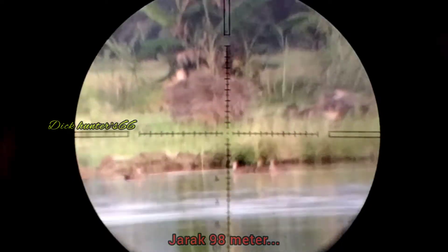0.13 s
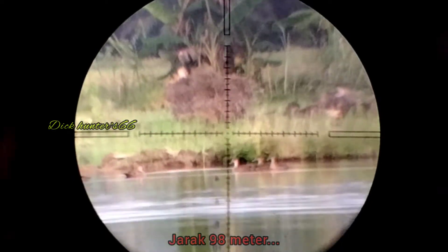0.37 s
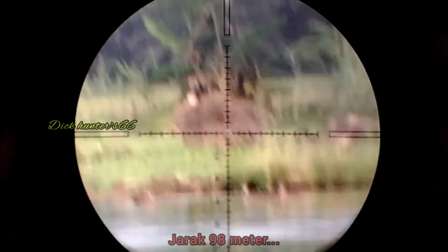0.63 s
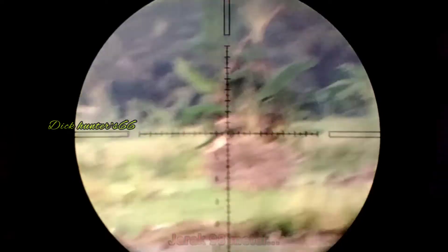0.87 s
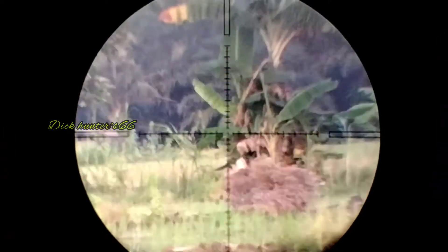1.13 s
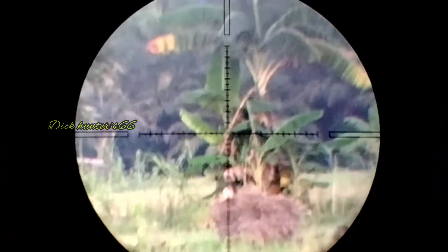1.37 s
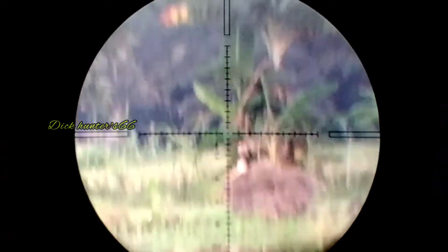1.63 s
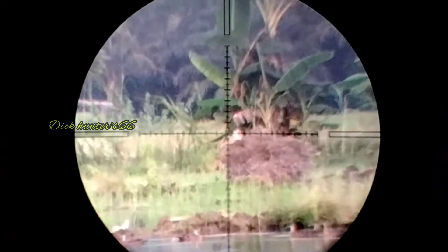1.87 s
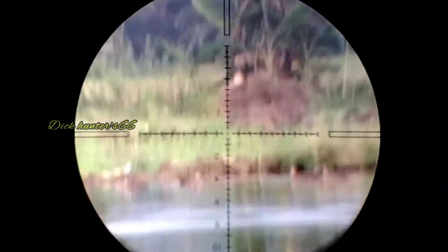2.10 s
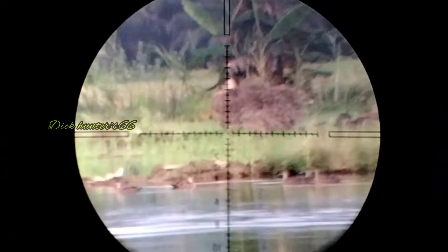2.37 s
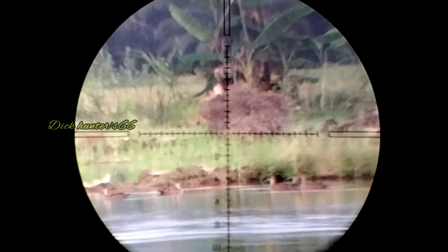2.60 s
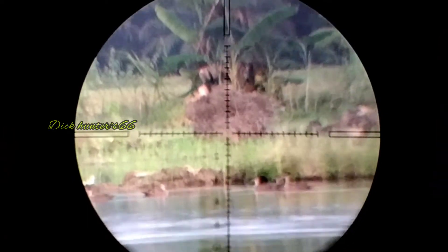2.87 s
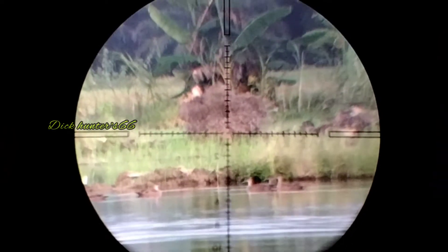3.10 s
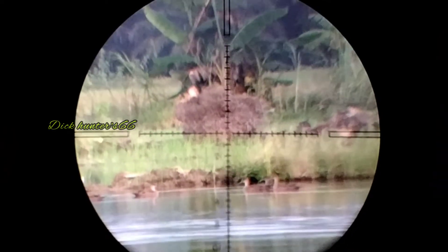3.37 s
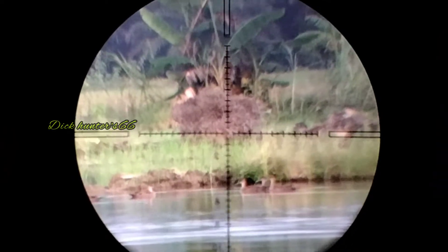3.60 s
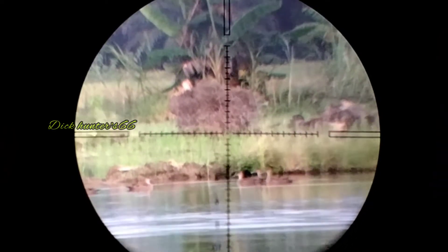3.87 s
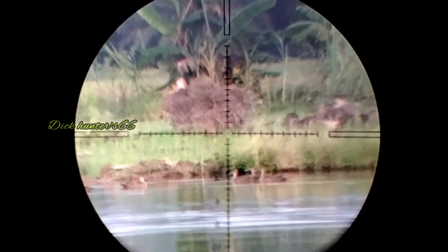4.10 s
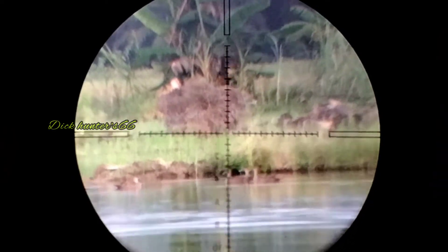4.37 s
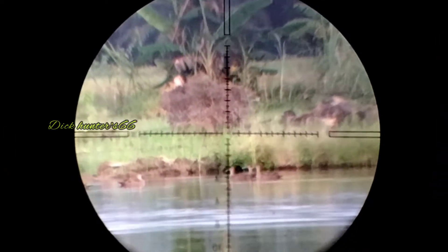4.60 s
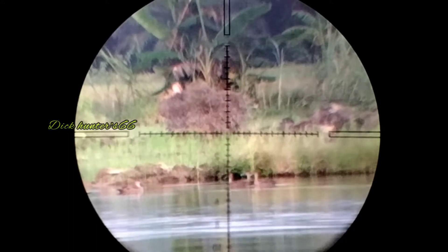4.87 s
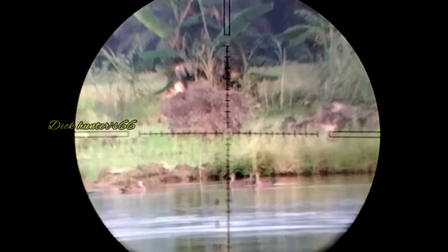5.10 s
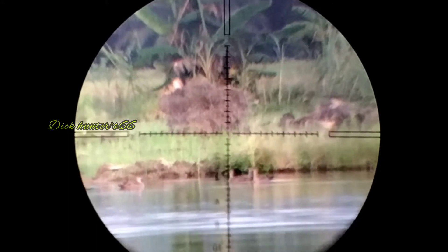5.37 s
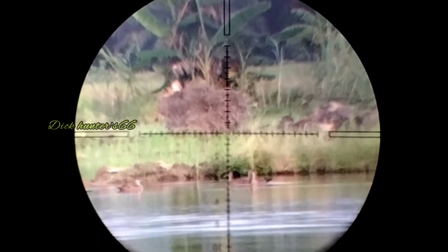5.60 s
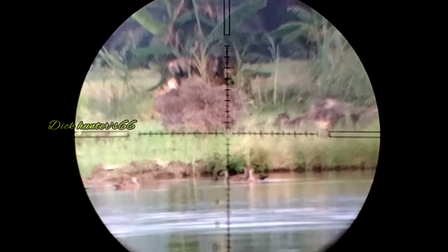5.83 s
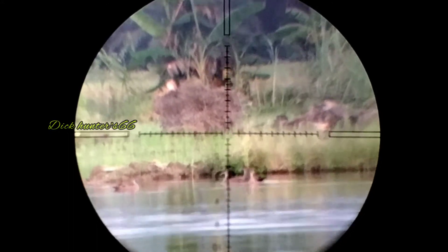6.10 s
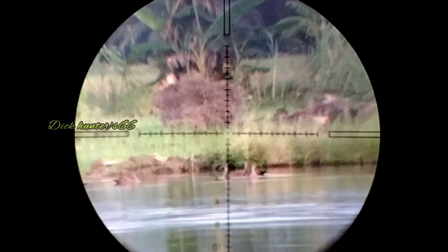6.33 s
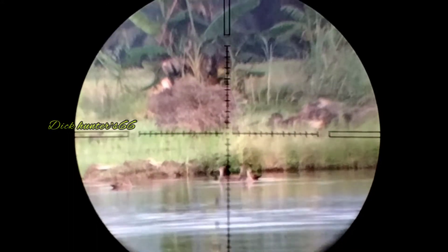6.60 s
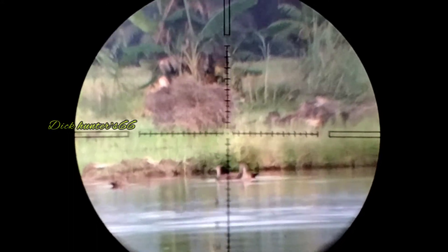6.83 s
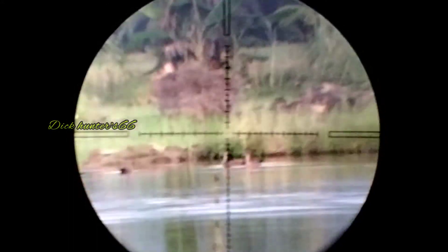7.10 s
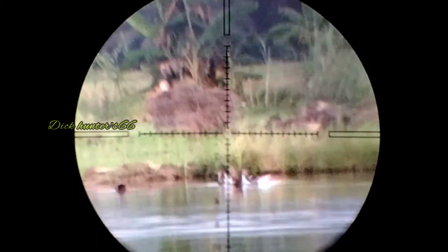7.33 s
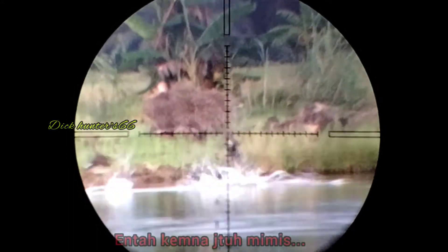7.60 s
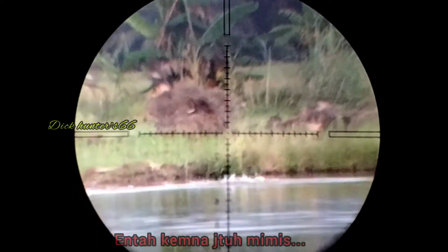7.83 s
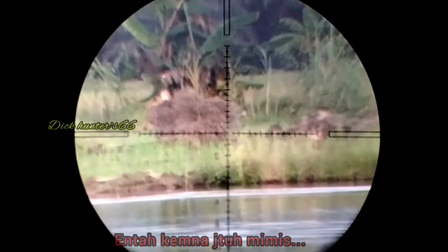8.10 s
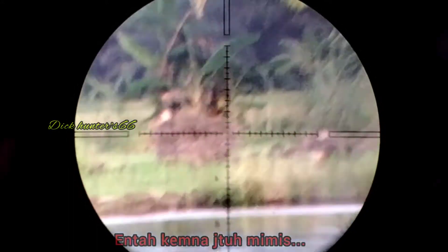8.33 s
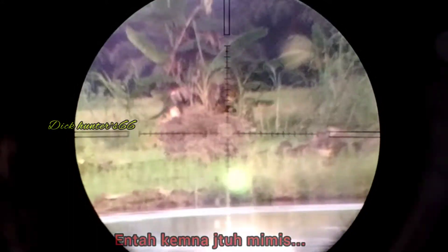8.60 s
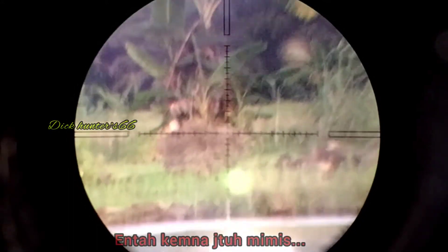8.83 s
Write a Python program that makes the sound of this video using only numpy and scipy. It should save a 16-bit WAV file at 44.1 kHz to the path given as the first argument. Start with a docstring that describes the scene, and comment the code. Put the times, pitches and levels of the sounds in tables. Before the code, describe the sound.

Outdoors by a pond, heard from a microphone attached to an air rifle, identical in both channels. From 0 s a thin, shrill insect whine near 9 kHz pulses in quick chirps, stops around 2.4 s, and resumes at about 2.7 s. Low wind buffets come and go, strongest from 1 to 4.4 s, with dull pops near 1.6, 2.1 and 2.3 s. Faint bubbles blip, clustering around 3.3 s, amid tiny dry rustling ticks. Small clicks occur near 0.4 and 5.3 s. At 6.8 s a trigger tick leads straight into a very loud, sharp crack, a rattling action and a burst of air, hissing until 7.0 s. A hollow metallic ping rings on for about a second over faint low rumble. The nearer insect song ends around 7.4 s, leaving a softer whine. Light clicks follow from 7.5 s, then a crisp, louder double clack at 8.1 s before quiet ambience.

```python
"""Beside a pond an air rifle is fired once, the microphone fixed to the gun: trigger tick, crack, rattling action,
escaping air and the ping of the air tube, then a few handling clicks. Insects whine near 9 kHz, water bubbles
blip faintly, a light wind buffets the microphone. Wind and air are shaped noise, contacts are noise bursts,
tube and knocks are decaying sines, nearer insects are a pulsed tone, bubbles are short rising blips."""
import sys
import numpy as np
from scipy import signal
from scipy.fft import rfft, irfft, next_fast_len
from scipy.io import wavfile
from scipy.ndimage import uniform_filter1d, map_coordinates

SR = 44100
rng = np.random.default_rng(int(sys.argv[2]) if len(sys.argv) > 2 else 0)


def dump(signal):
    """Clip the signal to [-1, 1] and save it as 16-bit WAV at the path in sys.argv[1]."""
    limited = np.clip(np.atleast_2d(signal).T, -1, 1)
    pcm = np.round(limited * 32767).astype(np.int16)
    wavfile.write(sys.argv[1], SR, pcm)


def rack_gain(trim_db):
    """Turn a fader trim in dB into the linear factor to multiply a signal by."""
    fader = np.asarray(trim_db, float)
    return 10 ** (fader / 20)


N = 395136
SHOT_S = 6.8265


def unit(x):
    """Scaled to rms 1."""
    return x / np.sqrt(np.mean(x ** 2) + 1e-20)


def wobble(knots_per_s):
    """Smooth random curve through normally distributed knots."""
    knots = rng.standard_normal(int(N * knots_per_s / SR) + 4)
    coarse = np.arange(0, N + 16, 16)
    curve = map_coordinates(knots, [coarse * knots_per_s / SR])
    return np.interp(np.arange(N), coarse, curve)


def coloured(x, spectrum):
    """x filtered through (f/Hz, level/dB) points joined on a log f axis."""
    size = next_fast_len(len(x) + 8192)
    hz, db = np.transpose(spectrum)
    log_f = np.log(np.fft.rfftfreq(size, 1 / SR) + 1)
    gain = rack_gain(np.interp(log_f, np.log(hz + 1), db, -120, -120))
    return irfft(rfft(x, size) * gain, size)[:len(x)]


def noise(spectrum):
    """Coloured noise of rms 1."""
    return unit(coloured(rng.standard_normal(N), spectrum))


def patchy(x, depth_db, shape):
    """x with random patches of gain, shape = (bins, frames) wide, rms 1."""
    z = signal.stft(x, nperseg=512)[2]
    knots = rng.standard_normal(np.array(z.shape) // shape + 2)
    field = map_coordinates(knots, np.indices(z.shape) / np.reshape(shape, (2, 1, 1)), order=1)
    patched = z * rack_gain(depth_db * unit(field))
    return unit(signal.istft(patched, nperseg=512)[1][:N])


def burst(t60_s):
    """Short decaying noise burst of peak 1."""
    t = np.arange(2000) / SR
    puff = rng.standard_normal(len(t)) * rack_gain(-60 * t / t60_s) * (1 - np.exp(-t / 0.00021))
    return puff / np.abs(puff).max()


def add(track, s, sound):
    """Mixes a sound in at time s."""
    part = track[round(s * SR):][:len(sound)]
    part += sound[:len(part)]


# buffet spectrum, relative: [f/Hz, level/dB]
BUFFET_SPECTRUM = [(12, -17.5), (20, -0.5), (40, 1), (80, -6.5), (130, -17.5), (200, -35), (260, -73.5)]
# drone spectrum, relative: [f/Hz, level/dB]
DRONE_SPECTRUM = [(50, -21.5), (80, -5.5), (125, -0.5), (180, -7), (300, -20.5), (400, -42)]
# gusts reaching the microphone, before flutter: [start t/s, hold/s, buffet level/dB]
GUSTS = [(0.021, .04, -60.5), (.58, 0.069, -56.5), (.74, 0.0396, -61.5), (1.095, 0.106, -48),
         (1.377, .33, -48.5), (1.847, 0.0183, -49), (2.004, 0.5616, -45.5), (2.676, 0.092, -46),
         (2.841, 0.034, -42.5), (2.917, 0.0224, -44), (3.065, 0.0335, -45), (3.26, 0.023, -49),
         (3.36, 0.216, -47), (3.729, 0.661, -47.5), (4.558, .03, -59.5), (5.072, 0.107, -62),
         (5.628, 0.076, -52.5), (5.868, .07, -52.5), (6.176, .04, -61.5), (6.342, 0.0324, -54.5),
         (6.406, 0.028, -55.5), (6.585, 0.245, -56.5)]
# wind pops on the microphone: [t/s, level/dB of the narrow bump, width/s]
POPS = [(1.24, -45.5, 0.0036), (1.585, -29.5, 0.00283), (2.065, -26.5, 0.001524), (2.346, -31, 0.00237),
        (6.34, -42.5, 0.00454)]
GUST_RISE_DB_PER_S, GUST_FALL_DB_PER_S, CALM_DB = 402.5, 275.5, -70
DRONE_DB, DRONE_DB_PER_BUFFET_DB, DRONE_AVERAGE_S = -63, 0.123, 0.41
SHAKE_DB, SHAKE_T60_S = -55.5, 4.68  # low rumble while the gun settles after the shot


def wind():
    """Gusts buffet the microphone in lumps and single pops; a steadier drone follows their mean."""
    t = np.arange(N) / SR
    buffet_db = np.full(N, float(CALM_DB))
    for s, hold_s, db in GUSTS:
        rise_db = GUST_RISE_DB_PER_S * np.maximum(s - t, 0)
        fall_db = GUST_FALL_DB_PER_S * np.maximum(t - s - hold_s, 0)
        buffet_db = np.maximum(buffet_db, db - rise_db - fall_db)
    shake = (t > SHOT_S) * rack_gain(SHAKE_DB - 60 * (t - SHOT_S) / SHAKE_T60_S)
    lumps = unit(rack_gain(2.64 * wobble(20)) * noise(BUFFET_SPECTRUM))
    out = (rack_gain(buffet_db + 1.23 * wobble(8.9)) + shake) * lumps

    slow_db = uniform_filter1d(buffet_db, size=round(DRONE_AVERAGE_S * SR))
    drone_db = DRONE_DB + DRONE_DB_PER_BUFFET_DB * (slow_db - slow_db.mean())
    out += rack_gain(drone_db + 1.453 * wobble(1.483) + 1.78 * wobble(5)) * noise(DRONE_SPECTRUM)

    t = np.arange(-882, 882) / SR
    for s, db, width_s in POPS:
        bump = np.exp(-(t / width_s) ** 2) - 0.263 * np.exp(-(t / (4 * width_s)) ** 2)
        add(out, s + t[0], rack_gain(db) * bump)
    return out


# chorus spectrum, relative: [f/Hz, level/dB]
CHORUS_SPECTRUM = [(150, -51.5), (250, -20), (320, -16), (560, -19.5), (900, -22.5), (1500, -19.5),
                   (2100, -23.5), (2900, -18.5), (4200, -29), (5000, -25), (6100, -36), (7000, -25),
                   (8200, -20.5), (8600, -15), (8780, -5), (9300, -2.5), (9750, -7), (10050, -14),
                   (10400, -23), (11000, -25.5), (13500, -29.5), (14500, -20.5), (16000, -22.5)]
# songs of the nearer insects: [start t/s, end t/s, level/dB re CHORUS_DB, chirp depth/0-1]
SONGS = [(-.05, 2.38, 9, 1), (2.739, 7.4, 9.5, 0.83), (7.0, 8.96, -15.5, .6)]
CHORUS_DB, CHORUS_STEP_AFTER_SHOT_DB = -58, 0.5
WING_HZ, WING_WAVER_HZ, PULSES_PER_S = 9100, 35, 138
CHIRPS_PER_S, TIRED_CHIRPS_PER_S, TIRING_S = 9.09, 6.9, .88  # tempo, tempo at song end, slowing time
WARM_UP_DB, WARM_UP_S = -7.5, 0.58  # level offset at song start, its time constant


def insects():
    """A few singers above a blurred chorus: pulse-train chirps swell and break off, slowing at song end."""
    t, songs = np.arange(N) / SR, np.zeros(N)
    for start, end, db, depth in SONGS:
        tiring = np.clip(t - end + TIRING_S, 0, None)
        lost_chirps = (CHIRPS_PER_S - TIRED_CHIRPS_PER_S) * tiring ** 2 / (2 * TIRING_S)
        chirps = CHIRPS_PER_S * (t - start) - lost_chirps
        swell = 1 - min(depth, 1) * (1 - (chirps % 1) ** .9)
        level = rack_gain(db + WARM_UP_DB * np.exp(-np.abs(t - start) / WARM_UP_S))
        songs += ((t > start) & (t < end)) * level * swell
    beat = np.cumsum(PULSES_PER_S + 3 * wobble(4)) / SR
    pulses = (.5 + .5 * np.cos(2 * np.pi * beat)) ** 1.5
    wing_cycles = np.cumsum(WING_HZ + WING_WAVER_HZ * wobble(70)) / SR
    wing = rack_gain(1.7 * wobble(30)) * np.sin(2 * np.pi * wing_cycles)
    singers = uniform_filter1d(songs, size=400) * pulses * wing

    chorus = patchy(noise(CHORUS_SPECTRUM), depth_db=1.8, shape=(3, 3))
    drift_db = CHORUS_STEP_AFTER_SHOT_DB * (t > SHOT_S) + 0.147 * wobble(1.425) + 0.744 * wobble(8.1)
    return rack_gain(CHORUS_DB) * (rack_gain(drift_db) * chorus + singers)


def bubbles(per_s=100):
    """Faint far water bubbles: rising blips in loose clumps, most near 3 kHz, weaker ones near 1.2 kHz."""
    draw = rng.random((int(per_s * N / SR), 4))
    high = draw[:, 1] < .75
    spread = draw[:, 2] - .5
    hz = np.where(high, 2950 * np.exp(0.361 * spread), 1200 * np.exp(0.736 * spread))
    size = rack_gain(np.where(high, -71, -77) + 14.44 * draw[:, 3] ** 4)
    t = np.arange(600) / SR
    life = t * hz[:, None] / 3.73  # envelope tops after 3.73 nominal cycles
    tone = np.sin(2 * np.pi * hz[:, None] * t * (1 + 0.01847 * life))
    grains = size[:, None] * tone * life * np.exp(1 - life)
    at = (draw[:, :1] * N).astype(int) + np.arange(len(t))
    return rack_gain(2.81 * wobble(7)) * np.bincount(at.ravel(), grains.ravel(), N)[:N]


def rustle(per_s=35):
    """Grass and cloth give tiny, scattered dry ticks."""
    draw = rng.random((int(per_s * N / SR), 2))
    ticks = np.bincount((draw[:, 0] * N).astype(int), rack_gain(-55.5 + 7.9 * draw[:, 1] ** 2), N)
    colour = [(1500, -39.5), (3000, 13), (5000, 4.0), (6100, -12.5), (7500, -5.5), (12000, -5), (16000, -24.5)]
    return coloured(ticks, colour)


# nearer water bubbles: [t/s, f/Hz at start, peak level/dB, length/s]
NEAR_BUBBLES = [(.045, 1250, -62, .014), (.36, 1449, -63.5, .016), (.7, 1090, -63, .06),
                (3.256, 955, -65, 0.0287), (3.296, 3250, -62, 0.0108), (3.31, 2101, -64, .02),
                (3.33, 1148, -63, 0.014), (3.34, 2595, -59, 0.0112), (3.347, 1786, -62, 0.011),
                (3.372, 3020, -61, 0.0091), (3.453, 1102, -63, 0.0203), (3.479, 1070, -64, 0.0192),
                (3.483, 2390, -59, 0.011)]
BUBBLE_RISE = 0.1224  # share of the pitch gained over a blip


def near_bubbles():
    """Each blip swells, glides up and fades."""
    out = np.zeros(N)
    for s, hz, db, length_s in NEAR_BUBBLES:
        t = np.arange(round(length_s * SR)) / SR
        cycles = hz * t * (1 + BUBBLE_RISE * t / (2 * length_s))
        add(out, s, rack_gain(db) * np.sin(np.pi * t / length_s) * np.sin(2 * np.pi * cycles))
    return out


# light clicks of trigger and grip: [t/s, peak level/dB, t60/s, brightness/dB at 9 kHz]
CLICKS = [(.41, -45, 0.0095, 5), (7.77, -52.5, .01, -5), (5.3, -50.5, 0.0135, 3),
          (6.799, -39.5, 0.015, -5.5), (7.6, -48, 0.0107, -5.5), (7.514, -49, 0.013, -14),
          (7.995, -48, 0.0171, -25), (8.094, -45, 0.04, 14), (8.0975, -42, 0.022, 5),
          (8.099, -32.5, 0.013, 18), (8.1057, -21.5, 0.01, 2), (8.1248, -27, 0.011, -2),
          (8.128, -47.5, 0.095, -19.5)]


def clicks():
    """Small dry clicks of steel and plastic: coloured noise bursts."""
    out = np.zeros(N)
    for s, db, t60_s, bright_db in CLICKS:
        colour = [(400, -12), (1200, -11.5), (2200, -4.5), (5000, -4.5),
                  (9000, bright_db), (13000, bright_db - 17), (16000, bright_db - 30)]
        click = coloured(burst(t60_s), colour)
        add(out, s, rack_gain(db) * click / np.abs(click).max())
    return out


# soft knocks of the stock: [t/s, f/Hz, level/dB before onset and decay, t60/s]
KNOCKS = [(.535, 406, -44.5, 0.018), (0.721, 539, -56, 0.025), (7.55, 1300, -60, 0.045),
          (8.126, 2020, -49, 0.06), (8.135, 2854, -63.5, 0.295)]


def knocks():
    """Each knock rings one damped wooden note."""
    out, t = np.zeros(N), np.arange(SR // 2) / SR
    for s, hz, db, t60_s in KNOCKS:
        onset = 1 - np.exp(-t / 0.00057)
        add(out, s, rack_gain(db - 60 * t / t60_s) * np.sin(2 * np.pi * hz * t) * onset)
    return out


# contacts in the action: [t/s, relative level/dB, offset of the signal/full scale until the next]
RATTLE = [(6.8255, -20, -0.0035), (6.8272, -7.5, 0.07), (6.8305, -14.5, -0.0574), (6.8321, -16.5, 0.0073),
          (6.836, -10, 0.049), (6.8398, -24.5, 0.073), (6.8436, -21, -0.034), (6.8446, -23.5, 0.0765),
          (6.847, -13.5, 0.036), (6.8506, -16, -0.0009), (6.854, -14, -0.055), (6.8562, -15, 0.0325),
          (6.864, -11, -0.0393), (6.8716, -10, 0.0467), (6.8785, -15, 0.067), (6.8851, -17.5, -0.01),
          (6.8884, -19, 0.0025), (6.893, -13, 0.0096), (6.899, -20, 0.0019), (6.906, -15.5, 0.0106)]
# contact spectrum, relative: [f/Hz, level/dB]
CRACK_SPECTRUM = [(200, -33.5), (500, -11.5), (1300, -10.5), (3000, -17.5), (5000, -17), (7400, -10.5),
                  (9100, 2), (11000, -6.5), (13000, -18.5), (15500, -14.5), (17000, -37.5)]
DIP_START_S, DIP_FALL_S, DIP_DEPTH, DIP_RECOVERY_S = 6.915, .115, .066, 0.2838


def action():
    """Each contact cracks and offsets the signal until the next; then a slow dip below zero, and recovery."""
    cracks, offsets = np.zeros(N), np.zeros(N)
    for s, db, offset in RATTLE:
        add(cracks, s, rack_gain(db - 1.5) * burst(t60_s=0.0103))
        offsets[round(s * SR):round(DIP_START_S * SR)] = offset
    scale = np.std(coloured(rng.standard_normal(SR), CRACK_SPECTRUM))
    late = (np.arange(N) / SR - DIP_START_S) / DIP_FALL_S
    fall = .5 - .5 * np.cos(np.pi * np.clip(late, 0, 1))
    recovery = np.exp(-np.maximum(late - 1, 0) * DIP_FALL_S / DIP_RECOVERY_S)
    dip = -DIP_DEPTH * fall * recovery
    return coloured(cracks, CRACK_SPECTRUM) / scale + uniform_filter1d(offsets + dip, size=30)


VALVE_SHUT_S, SHUT_T60_S = 7.003, 0.094


def outflow(puff_db, puff_t60_s, jet_db, sag_db_per_s, echo_db, echo_t60_s):
    """Level of a muzzle puff, a sagging jet until the valve shuts, and a faint echo that lingers."""
    t = np.arange(N) / SR - SHOT_S
    shut = np.maximum(t + SHOT_S - VALVE_SHUT_S, 0)
    late = np.maximum(t, 0)
    puff = rack_gain(puff_db - 60 * late / puff_t60_s)
    jet = rack_gain(jet_db - sag_db_per_s * late - 60 * shut / SHUT_T60_S)
    echo = rack_gain(echo_db - 60 * shut / echo_t60_s)
    return (t > 0) * np.sqrt(puff ** 2 + jet ** 2 + echo ** 2)


# body of the escaping air, relative: [f/Hz, level/dB]
BODY_SPECTRUM = [(150, -12), (300, -2.5), (620, -7), (1000, -5), (1600, -7), (2800, -5.5), (4000, -12.5),
                 (5300, -10.5), (6000, -54.5)]
# hiss of the escaping air, relative: [f/Hz, level/dB]
HISS_SPECTRUM = [(5300, -50.5), (6100, -6), (7500, -2.5), (9000, -3), (11000, -8.5), (13500, -10.5),
                 (16000, -11)]


def blast():
    """Air leaves the barrel: a body of many short resonances and a banded hiss, both fluttering."""
    body_level = outflow(puff_db=-28, puff_t60_s=0.2584, jet_db=-43, sag_db_per_s=50.5,
                         echo_db=-63, echo_t60_s=1.49)
    hiss_level = outflow(puff_db=-27.5, puff_t60_s=0.0019, jet_db=-37, sag_db_per_s=25,
                         echo_db=-55, echo_t60_s=0.73)
    body = rack_gain(3.5 * wobble(200)) * patchy(noise(BODY_SPECTRUM), depth_db=3, shape=(2, 8))
    hiss = rack_gain(1.4 * wobble(250)) * patchy(noise(HISS_SPECTRUM), depth_db=3.5, shape=(3, 12))
    return body_level * body + hiss_level * hiss


# air tube modes: [f/Hz, top level/dB, top t/s, swell up to it/dB, t60/s]
TUBE_MODES = [(766.5, -37, 6.995, 5, 0.372), (1514.7, -45, 6.9885, 21, 2.093),
              (3026, -50.5, 7.04, 6.5, 0.395), (3022, -55, 6.986, 13.5, 1.6), (2327, -58.5, 7.0, 6.5, 0.32),
              (3684, -65, 7.0, -3, 0.37), (4160, -66, 7.0, 6.5, 0.53), (4610, -70, 7.054, 0.5, 0.74),
              (5280, -61, 7.0, 10.5, 0.496), (333, -53, 6.98, 11.5, 0.2889), (270, -58, 6.96, 0.5, 0.457),
              (452, -62, 7.0, 1, 0.36), (1000, -60, 7.0, 3.5, 0.34), (2020, -56.5, 7.0, 0, 0.186)]


def ping():
    """Air column in the tube: each mode ramps to its top level after the shot, then dies at its own speed."""
    out = np.zeros(N)
    for hz, db, top_s, swell_db, t60_s in TUBE_MODES:
        rise_s = top_s - SHOT_S
        t = np.arange(round((rise_s + t60_s) * SR)) / SR
        late = t - rise_s
        level_db = np.where(late < 0, swell_db * late / rise_s, -60 * late / t60_s)
        add(out, SHOT_S, rack_gain(db + level_db) * np.sin(2 * np.pi * hz * t))
    return out


def scene():
    """One microphone feeds both channels."""
    ambience = wind() + insects() + bubbles() + rustle() + near_bubbles()
    gun = clicks() + knocks() + action() + blast() + ping()
    mono = ambience + gun
    return np.array([mono, mono])


def band_limit(x):
    """A steep low-pass at the top of the band."""
    return signal.sosfilt(signal.butter(12, 16970, fs=SR, output="sos"), x)


def record(dry):
    """Takes the finished mix to the output."""
    return band_limit(dry)


dry = scene()
out = record(dry)
dump(out)
```